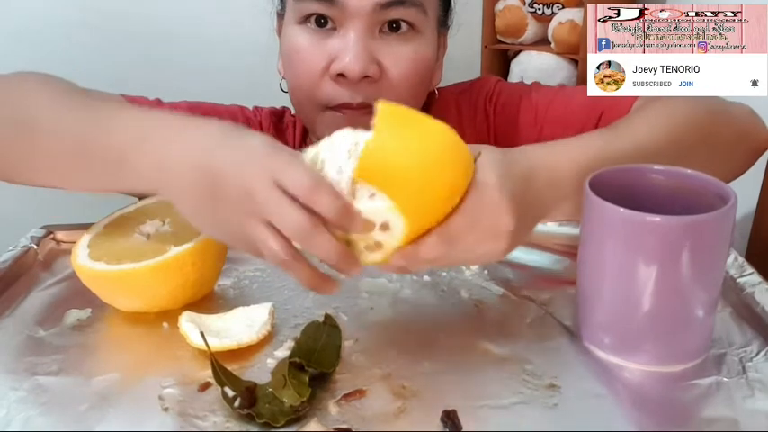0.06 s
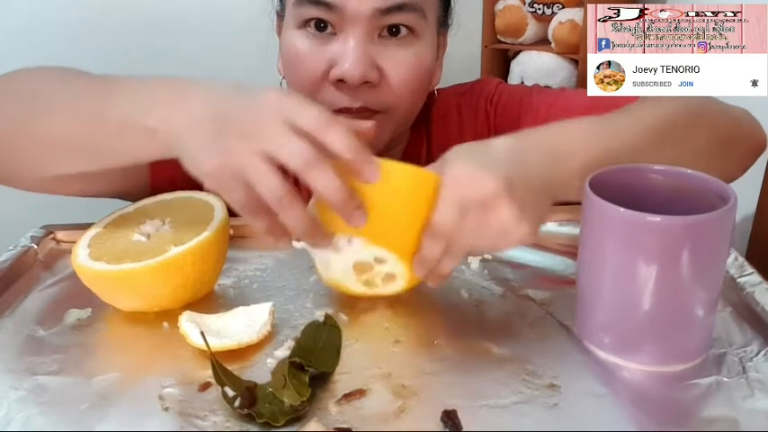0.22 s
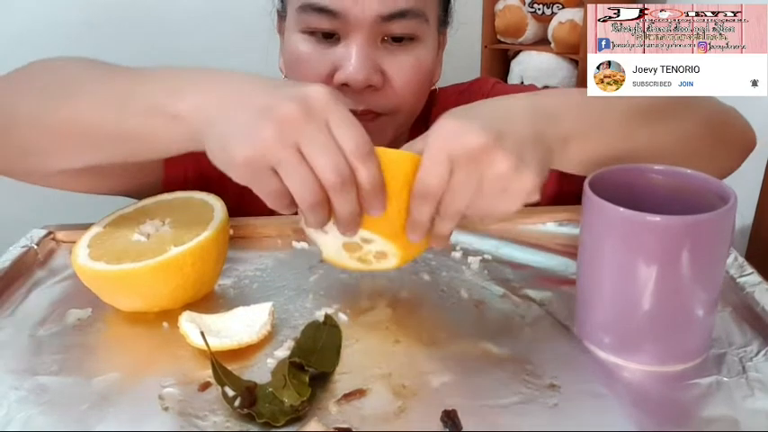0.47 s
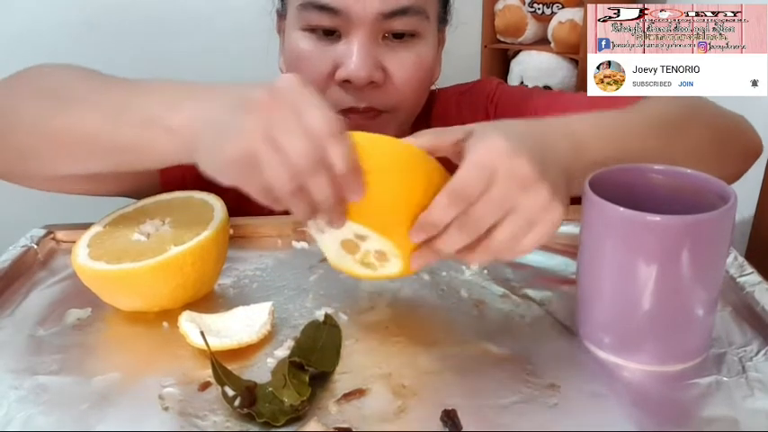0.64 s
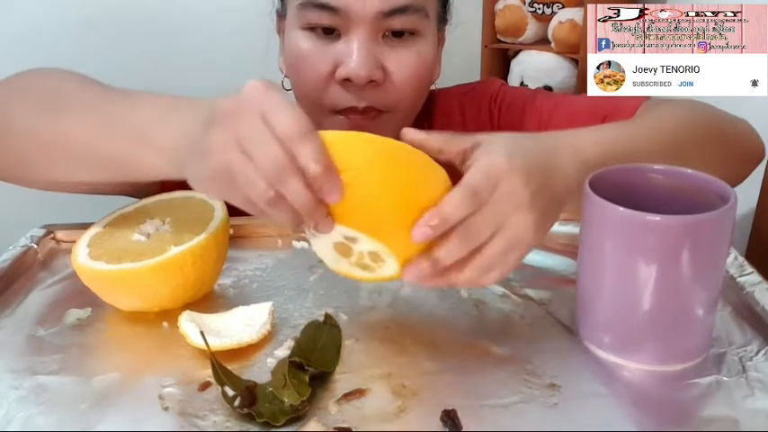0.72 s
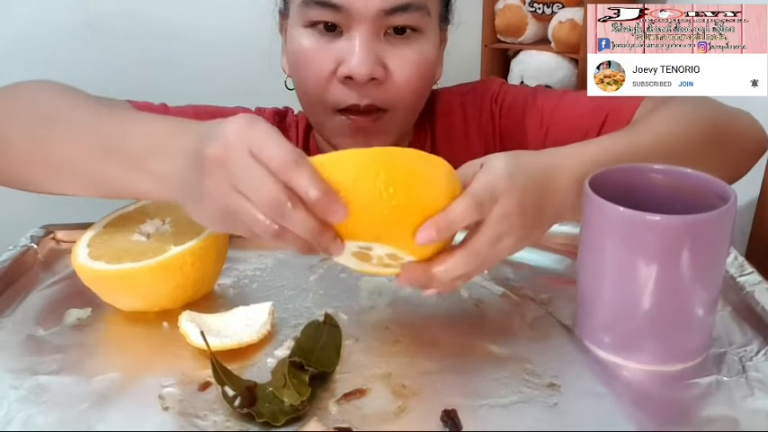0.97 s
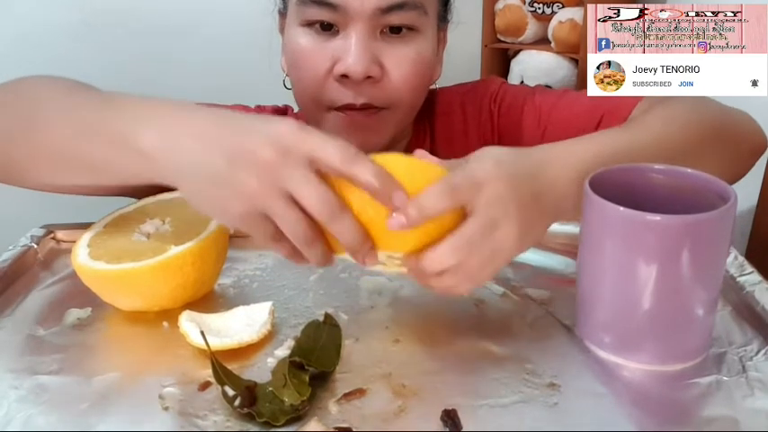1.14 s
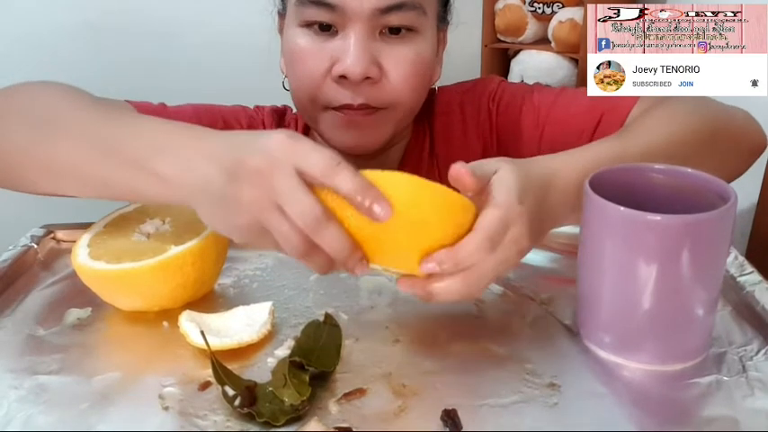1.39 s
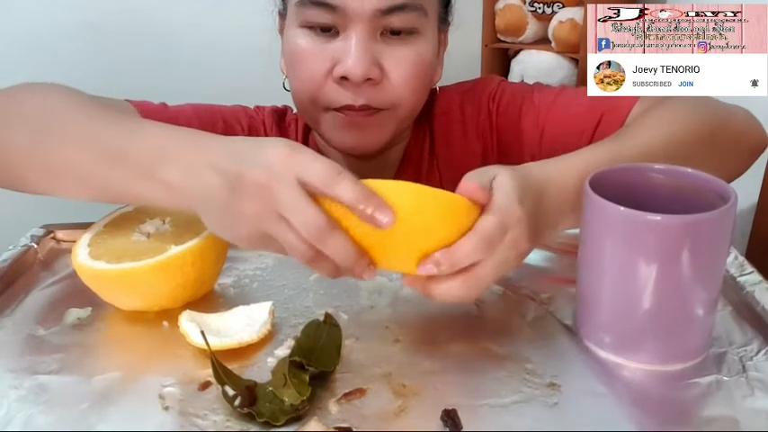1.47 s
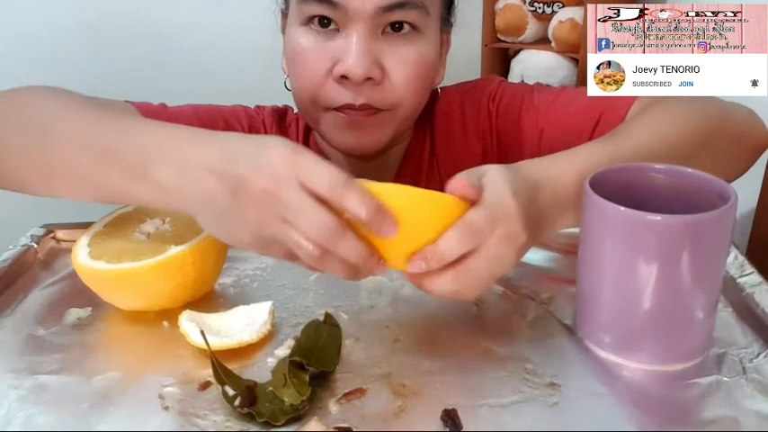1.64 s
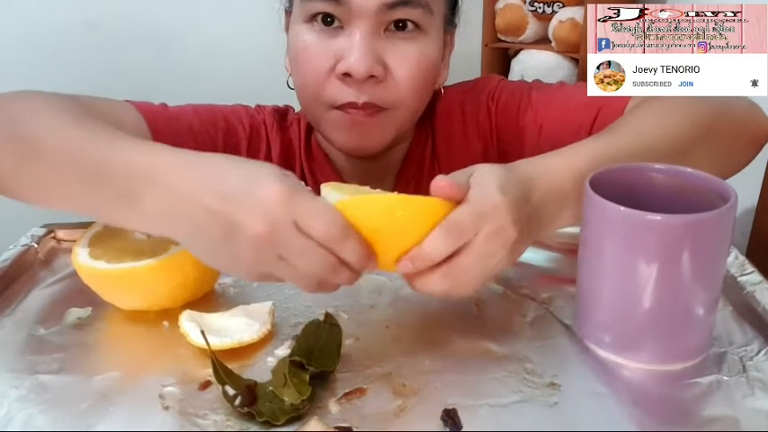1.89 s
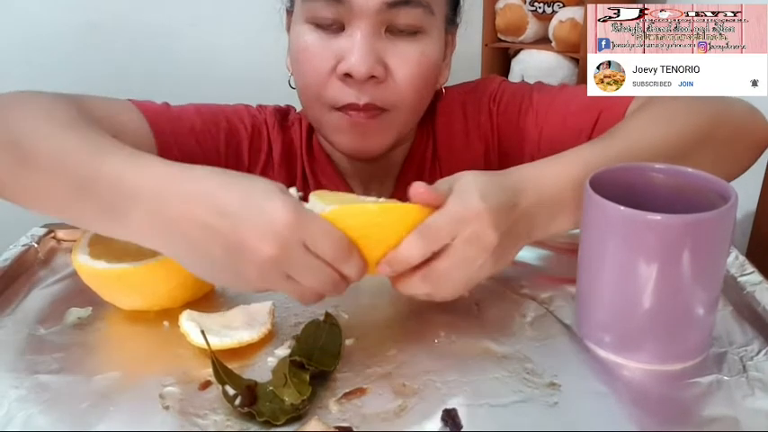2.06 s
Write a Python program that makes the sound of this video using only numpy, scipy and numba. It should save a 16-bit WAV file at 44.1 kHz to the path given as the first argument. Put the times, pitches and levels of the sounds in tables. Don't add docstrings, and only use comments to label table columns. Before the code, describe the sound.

Close stereo phone pickup indoors of fruit rind ripping: near silence, a quick bouncing thud with slight foil rattle, a faint skin slide, a long quiet gap, then bright crunchy tearing and a few trailing ticks.

```python
import sys
import numpy as np
from scipy import signal
from scipy.fft import rfft, irfft
from scipy.io import wavfile
from scipy.ndimage import uniform_filter1d
from numba import njit

SR = 44100
rng = np.random.default_rng(int(sys.argv[2]) if len(sys.argv) > 2 else 0)


def magnitude_from_level(level_db):
    exponent = np.asarray(level_db, float) / 20
    return 10 ** exponent


def wav_out(sig):
    wavfile.write(sys.argv[1], SR, np.round(np.clip(np.atleast_2d(sig).T, -1, 1) * 32767).astype(np.int16))


N = 92610
T = np.arange(N) / SR
SHORT = T[:SR // 2]
SIZE = 8192
HZ = np.arange(SIZE // 2 + 1) * SR / SIZE + 1e-3
LEFT_LEAD_S = 0.000299


def rips():
    # t/s, hold/s, level/dB, peel body relative level/dB
    tears = [(1.5246, 0.0049, -39, -9), (1.5379, 0.0069, -19.5, -22), (1.549, 0.015, -27.5, -10),
             (1.573, 0.038, -46, 5.5), (1.6226, 0.009, -31, -2), (1.644, 0.007, -54.5, 14),
             (1.662, 0.0053, -29, -4), (1.67, 0.0077, -24, -9), (1.683, 0.0021, -22.5, -3.5),
             (1.69, 0.014, -36.5, 9.5), (1.705, 0.015, -21.5, -6), (1.721, 0.0127, -27.5, 4),
             (1.731, 0.0043, -24.5, -7.5), (1.743, 0.029, -24.5, -5), (1.767, 0.0099, -24, -14),
             (1.7743, 0.0096, -19, -13.5), (1.788, 0.0076, -21.5, -8), (1.798, 0.0054, -20.5, -10.5),
             (1.808, 0.006, -25.5, -11.5), (1.817, 0.0036, -29, -11), (1.822, 0.01, -39.5, -1.5),
             (1.839, 0.023, -37.5, -15.5), (1.963, 0.019, -52.5, -28), (2.0065, 0.00089, -54, -23),
             (2.0096, 0.0025, -27, -28.5), (2.024, 0.011, -45, -19), (2.044, 0.043, -49.5, -19.5),
             (2.088, 0.0047, -35.5, -22.5)]
    # f/Hz, density/dB
    pith = [(1200, -41), (2000, -16), (4250, -5.5), (5600, -4.5), (8200, -7), (9000, -4), (11100, -4),
            (15500, -4.5)]
    # f/Hz, density/dB
    body = [(70, -7.5), (140, -15), (250, -18), (500, -6.5), (900, 0.5), (1600, 2.5), (2800, 0.5),
            (5000, 2.5)]
    attack_s, release_s = 0.00076, 0.003
    env = np.array([magnitude_from_level(db) * shape(s, attack_s, hold, release_s) for s, hold, db, _ in tears])
    bright = wide(pith, 9000, 3.0, 2.4, 2440, 16900)
    dull = magnitude_from_level(-4) * wide(body, 3000, 3.77, 1.11, 276, 3650)
    body_gain = magnitude_from_level(np.array(tears)[:, 3])
    return env.sum(axis=0) * bright + body_gain @ env * dull


def pops():
    # t/s, f/Hz, level/dB, t60/s
    bursts = [(.079, 13100, -52, 0.0044), (.119, 12500, -51, .004), (.2875, 7420, -42, .01),
              (.613, 4400, -58.5, .03), (.7755, 7130, -39, .005), (1.464, 10500, -50, .006),
              (1.5255, 4300, -35.5, .012), (1.5392, 13700, -24.5, .006), (1.5396, 4390, -20, 0.015),
              (1.54, 7440, -22.5, .01), (1.5465, 11000, -27, .006), (1.551, 7200, -23, 0.0069),
              (1.6232, 903, -34.5, 0.046), (1.668, 5700, -14.5, 0.015), (1.672, 7570, -22, 0.016),
              (1.6845, 5000, -21, 0.012), (1.70, 140, -45.5, .12), (1.7041, 603, -27, 0.018),
              (1.7113, 12600, -29, .005), (1.7118, 4440, -18, 0.011), (1.7185, 510, -33.5, 0.044),
              (1.7222, 5000, -25, .012), (1.7227, 600, -34.5, 0.026), (1.729, 4700, -25, .01),
              (1.735, 11600, -25, .006), (1.7355, 7200, -20, 0.0091), (1.736, 13000, -24, .006),
              (1.775, 5454, -16, 0.023), (1.778, 11000, -16, 0.011), (1.7785, 6000, -16, .012),
              (1.78, 7300, -21, 0.011), (1.7905, 7600, -20, .01), (1.80, 5330, -18, 0.011),
              (1.802, 7000, -19.5, 0.006), (1.8105, 7470, -21, .01), (2.0102, 6890, -26.5, 0.026),
              (2.011, 8500, -29, .012), (2.031, 7070, -47, .006), (2.089, 7800, -27.5, 0.019),
              (2.0915, 5500, -33.5, .01)]
    one = rings(bursts)
    return np.array([one, late(one, LEFT_LEAD_S)])


def slides():
    # t/s, hold/s, level/dB, attack/s
    strokes = [(0, 0.06, -67, 0.0018), (0.067, 0.26, -64.5, 0.037), (0.2422, 0.03, -51, 0.0019),
               (0.287, 0.0045, -49.5, .001), (0.352, 0.12, -69.5, .01), (.61, 0.02, -83, 0.0045),
               (0.716, 0.095, -43, 0.018), (0.962, .01, -63, 0.0086), (1.222, 0.023, -51.5, 0.025),
               (1.372, 0.021, -62, 0.0076), (1.441, 0.0092, -58.5, 0.009), (1.4626, 0.061, -52, .002),
               (1.92, 0.067, -59, .02)]
    # f/Hz, density/dB
    skin = [(1180, -60), (2000, -39), (2820, -16), (3490, -23.5), (4500, -8.5), (6930, -8), (9270, -7),
            (11700, -7.5), (15500, -9)]
    # f/Hz, density/dB
    fabric = [(300, -10), (600, -0.5), (1000, -2), (1500, -10.5), (3000, -19)]
    release_s = 0.0089
    env = sum(magnitude_from_level(db) * shape(s, attack, hold, release_s) for s, hold, db, attack in strokes)
    rustle_env = magnitude_from_level(-68.5) * shape(0, 0.02, 0.18, release_s)
    rustle = rustle_env * colour(rng.standard_normal((2, N)), fabric)
    return env * wide(skin, 12000, 4.64, 2.5, 3000, 16000) + rustle


def knock():
    # t/s, level/dB, contact time/ms
    contacts = [
        (0.2437, -35.5, 2.3),
        (0.2472, -23.5, 1.17),
        (.2493, -24.5, 0.83),
        (0.2555, -20, 1.08),
        (0.2577, -17.5, 0.78),
        (0.2658, -34, 0.89),
        (0.289, -41.5, 1.8),
    ]
    # f/Hz, level/dB, t60/s
    modes = [(52.3, -9.5, 0.82), (75.3, -10.5, 0.3), (105.5, -4, 0.26), (132.2, -2, 0.095), (168.5, 3, .1),
             (195.1, -9, 0.21), (251, -6, .15), (317.5, 1.5, 0.1), (432, -12, 0.12), (513, -5, .09),
             (667, -5.5, 0.13), (805, -7, 0.11), (991, -13, 0.057), (1231, -19, 0.092)]
    # f/Hz, density/dB
    foil_points = [(600, -6), (900, -4.5), (1600, -8), (2600, -12.5), (3600, -13), (6000, -24), (9000, -30)]
    # t/s, f/Hz, level/dB, t60/s
    small_rings = [
        (.2485, 1700, -41, 0.091),
        (.2495, 800, -29.5, 0.074),
        (.2505, 3010, -44, 0.046),
        (.262, 1600, -44, 0.052),
        (.27, 1950, -46, 0.11),
        (0.24, 2600, -52, .03),
        (.459, 540, -54, 0.092),
        (.461, 691, -58.5, 0.05),
        (.56, 840, -68, .05),
    ]
    push = 0
    for s, db, ms in contacts:
        phase = np.clip((SHORT - s) / ms * 1000, 0, 1)
        push = push + magnitude_from_level(db) * np.sin(np.pi * phase) ** 2 / (ms * SR / 2000)
    ring = rings([(0, hz, db, t60) for hz, db, t60 in modes])
    settle = magnitude_from_level(-60 * np.maximum(T - 0.537, 0) / 0.22)
    body = magnitude_from_level(-1) * signal.fftconvolve(push, ring)[:N] * settle

    foil = colour(snaps(5000, 2.5, 3.3, 476, 7950), foil_points)[0]
    rattle_t60_s = 0.14
    shake = sum(magnitude_from_level(db) * shape(s, .001, 0, rattle_t60_s / np.log(1000)) for s, db, _ in contacts)
    return body + magnitude_from_level(-22) * shake * foil + rings(small_rings)


def wide(points, *rule):
    share = 0.7
    both = snaps(*rule)
    common = np.array([both, late(both, LEFT_LEAD_S)])
    separate = np.array([snaps(*rule), snaps(*rule)])
    return colour(np.sqrt(1 - share) * common + np.sqrt(share) * separate, points)


def snaps(per_s, scatter_db, cycles, lo_hz, hi_hz):
    u = rng.random((30000, 3))
    at = np.cumsum(-np.log(1 - u[:, 0])) / per_s * SR
    keep = at < N
    hz = lo_hz * (hi_hz / lo_hz) ** u[keep, 1]
    size = magnitude_from_level(scatter_db * np.minimum(-np.log(1 - u[keep, 2]), 4.0))
    return unit(grains(at[keep].astype(np.int64), 2 * np.pi * hz / SR, size, 1. * cycles, N))


@njit
def grains(at, turn, size, cycles, count):
    out = np.zeros(count + 256)
    for k in range(len(at)):
        p = np.exp((1j - .5 / cycles) * turn[k])
        z = size[k] * np.sqrt(turn[k]) + 0j
        for i in range(min(255, int(10 * cycles / turn[k]))):
            out[at[k] + i] += z.real
            z *= p
    return out[:count]


def rings(rows):
    out = np.zeros(N + SR)
    for s, hz, db, t60 in rows:
        t = T[:int(min(1.5 * t60, .5) * SR)]
        a = int(s * SR)
        out[a:a + len(t)] += magnitude_from_level(db) * np.exp(-np.log(1000) * t / t60) * np.sin(2 * np.pi * hz * t)
    return out[:N]


def shape(start, attack, hold, release):
    out = np.zeros(N)
    a = max(int(start * SR), 0)
    t = T[a:a + int((attack + hold + 12 * release) * SR)] - start
    fade = np.exp(-np.maximum(t - attack - hold, 0) / release)
    out[a:a + len(t)] = np.clip(t / attack, 0, 1) * fade
    return out


def late(x, lag_s):
    return irfft(rfft(x) * np.exp(-2j * np.pi * np.arange(N // 2 + 1) * SR / N * lag_s), N)


def colour(x, points):
    # f/Hz, width/Hz, level/dB
    port = [(2940, 204, 1), (3543, 251, -3), (4510, 460, 3.5), (5570, 450, 3), (7300, 1000, 6.5),
            (8400, 650, 4.5), (11570, 1520, 3.5), (9600, 900, -3)]
    f, db = np.array(points, float).T
    db = np.interp(np.log(HZ), np.log(f), db)
    db = db - 18 * np.log2(np.maximum(f[0] / np.maximum(HZ, 10), 1))
    db = db + sum(g / (1 + ((HZ - c) / (w / 2)) ** 2) for c, w, g in port)
    cep = irfft(db * np.log(10) / 20, SIZE)
    cep[1:SIZE // 2] *= 2
    cep[SIZE // 2 + 1:] = 0
    impulse = irfft(np.exp(rfft(cep)), SIZE)
    return unit(signal.fftconvolve(np.atleast_2d(x), impulse[None], axes=1)[:, :N])


def unit(x):
    return x / np.sqrt(np.mean(x ** 2))


def room(x):
    # f/Hz, t60/s
    decay = [(150, 0.29), (500, 0.23), (1500, 0.3), (4000, 0.28), (9000, 0.19), (14000, 0.2)]
    tail = 0
    for hz, t60 in decay:
        sos = signal.butter(2, [hz / 1.89, min(hz * 1.75, .45 * SR)], "band", fs=SR, output="sos")
        mid, side = signal.sosfilt(sos, rng.standard_normal((2, len(SHORT))))
        pair = mid + min(hz / 1200, 1) * side * np.array([[1], [-1]])
        tail = tail + pair * magnitude_from_level(-60 * SHORT / t60) * (SHORT > 0.0022)
    return signal.fftconvolve(x[None], tail / np.sqrt(np.sum(tail[0] ** 2)), axes=1)[:, :N]


def air():
    # f/Hz, density/dB
    still = [(18, -38.5), (30, -3.5), (59, 1), (114, -10), (237, -14.5), (639, -17.5), (3400, -24),
             (4310, -27.5), (15500, -25)]
    mid, side = colour(rng.standard_normal((2, N)), still)
    side = signal.sosfilt(signal.butter(1, 400, "high", fs=SR, output="sos"), side)
    drift = unit(uniform_filter1d(rng.standard_normal(N), size=6000))
    return magnitude_from_level(-66 + 0.51 * drift) * (mid + side * np.array([[1], [-1]])) / np.std(mid)


def scene():
    hands = rips() + pops() + slides()
    thud = knock()
    left_db = 0.5
    near = hands * magnitude_from_level(np.array([[.5], [-.5]]) * left_db)
    near = near + np.array([thud * magnitude_from_level(0.44), late(thud, 0.00013) * magnitude_from_level(1.67)])
    echoes = room(magnitude_from_level(-1.5) * hands.mean(axis=0) + magnitude_from_level(-7) * thud)
    return near + echoes + air()


def low_pass(x):
    return signal.sosfilt(signal.butter(12, 16650, fs=SR, output="sos"), x)


def record(dry):
    low_cut = signal.butter(5, 43.1, "high", fs=SR, output="sos")
    top_cut = signal.ellip(10, .3, 60, 15500, fs=SR, output="sos")
    mix = signal.sosfilt(top_cut, signal.sosfilt(low_cut, dry))
    return low_pass(mix)


dry = scene()
out = record(dry)
wav_out(out)
```